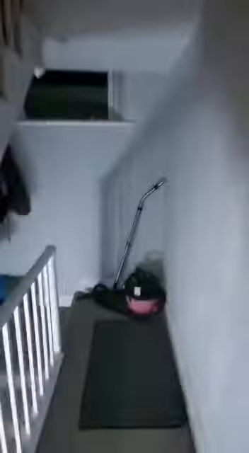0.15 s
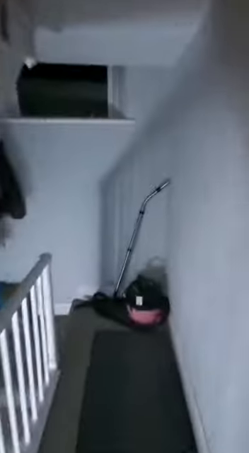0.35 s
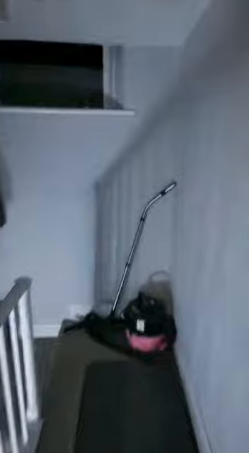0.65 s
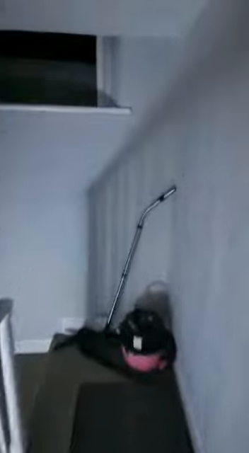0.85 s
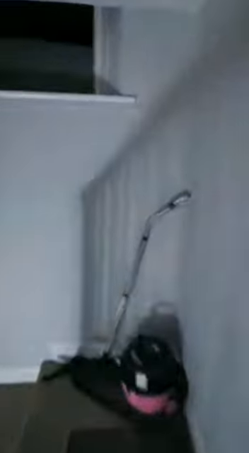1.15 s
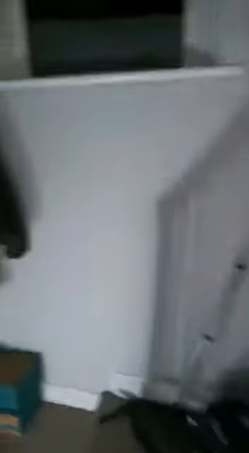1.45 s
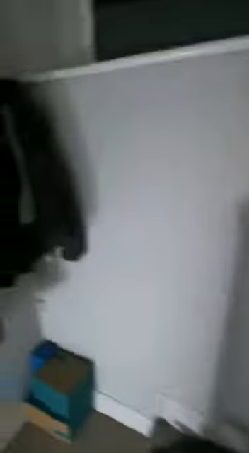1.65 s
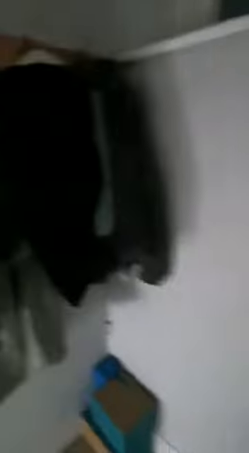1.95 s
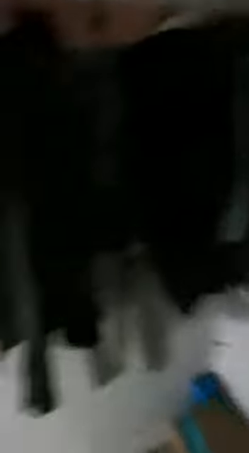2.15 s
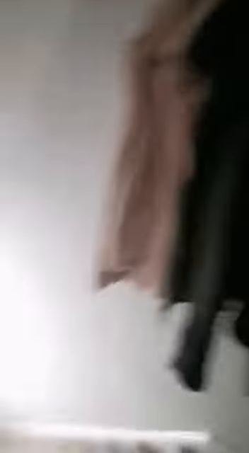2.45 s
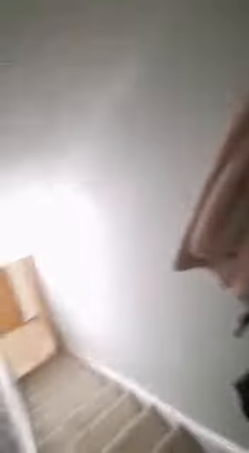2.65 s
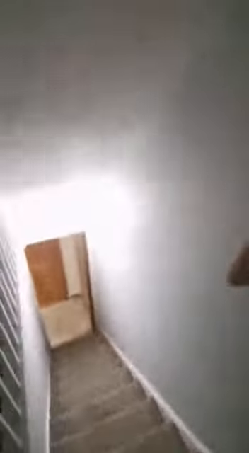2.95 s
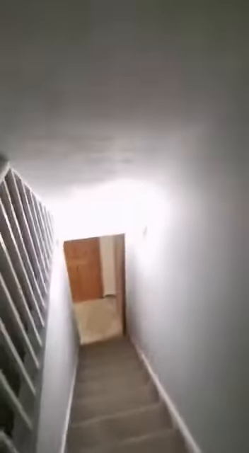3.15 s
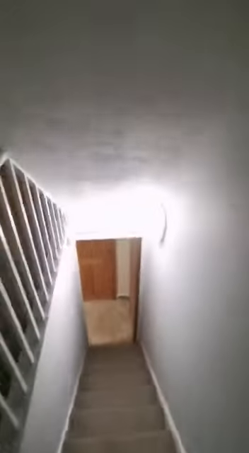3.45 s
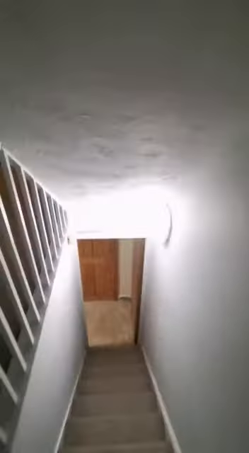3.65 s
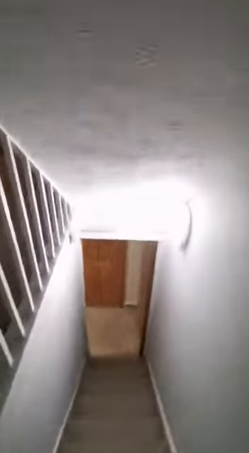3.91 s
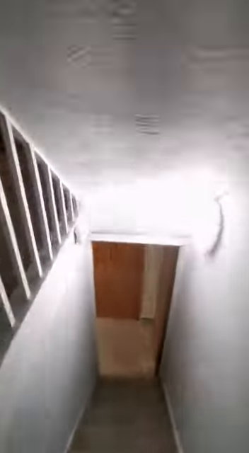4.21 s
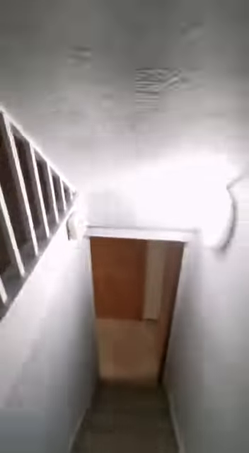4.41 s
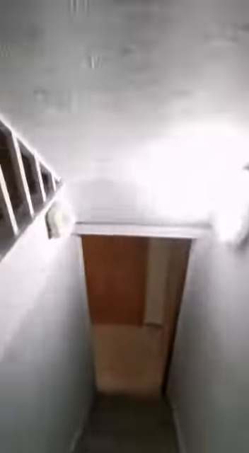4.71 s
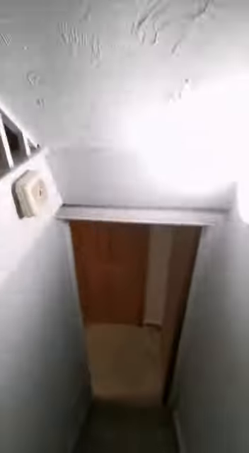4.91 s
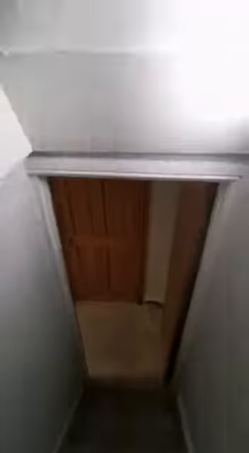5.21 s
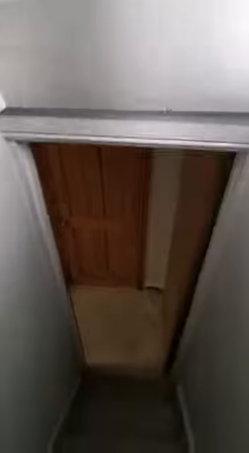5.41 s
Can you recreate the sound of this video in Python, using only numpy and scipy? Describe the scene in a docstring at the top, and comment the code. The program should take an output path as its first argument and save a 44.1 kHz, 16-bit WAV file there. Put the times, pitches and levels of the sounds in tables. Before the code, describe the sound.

Dull carpeted steps, roughly two per second, start quietly over a faint air hiss. One abrupt click sounds only on the left, then a sole drags in a turn. Going down hollow wooden stairs, boards knock and a hand slides dryly on painted plaster. The last steps come faster and much louder, booming, creaking and cracking in a small, slightly echoing stairwell.

```python
"""Soft footfalls cross a carpeted landing and go down a boxed-in wooden staircase: each load swings the floor
at a low mode and excites timber modes, joists and frame, more strongly on the treads.
Boards and hand knock (impulses and dying noise through resonances); joints squeak by stick and slip.
Cloth rustles and soles drag (enveloped noise), a palm slides along the wall (noise through a gliding resonance),
and filtered impulses tick at the left microphone port. Decaying noise echoes the knocks and squeaks; still air hisses."""
import sys
import numpy as np
from scipy import signal
from scipy.fft import rfft, irfft, next_fast_len
from scipy.io import wavfile

SR = 44100
rng = np.random.default_rng(int(sys.argv[2]) if len(sys.argv) > 2 else 0)


def store_wav(level_fs):
    """Save 16-bit WAV to argv[1]."""
    pcm = np.round(np.clip(np.atleast_2d(level_fs), -1, 1) * 32767)
    wavfile.write(sys.argv[1], SR, pcm.T.astype(np.int16))


N = 245637
T = np.arange(N) / SR

# All spectra are relative: columns f/Hz, level/dB. Source levels precede the gains of their layer.
# Still air of the house
AIR_SPECTRUM = [(20, 0.5), (43, 2.5), (154, -6), (222, -17.5), (319, -15.5), (660, -20), (2080, -30.5),
                (4420, -33.5), (7110, -29), (9200, -45.5), (15000, -45)]
AIR_DB = -63.5
# Diffuse field at the two ports: f/Hz, side over mid level/dB
SIDE_OVER_MID = [(60, -11.5), (250, -19.5), (500, -14.5), (1000, -11), (2000, -3), (5000, 0)]
# Spectral balance of the ports: f/Hz, left over right level/dB
LEFT_OVER_RIGHT = [(60, -2), (700, -2), (1800, 1), (3500, 0.5), (7000, -5), (14000, -2.5)]

# Steps: first touch t/s, boom level/dB, boom f/Hz, swell time t/s, timber level/dB;
# then full weight: delay t/s, boom level/dB, boom f/Hz, timber level/dB; then cloth swish level/dB
STEPS = [(0.12, -44, 62, 0.031, -66, 0.078, -57.5, 70.5, -50.5, -61),
         (.688, -40.5, 37.3, 0.028, -52.5, 0.036, -61, 49.7, -62, -65.5),
         (1.303, -25.5, 49.7, 0.029, -57.5, 0.045, -58, 50.6, -57, -64.5),
         (1.868, -36, 40.3, 0.026, -50, 0.029, -49, 52.7, -51.5, -63),
         (2.452, -36.5, 96.3, .022, -43, .09, -35.5, 51.9, -54.5, -61.5),
         (3.09, -52.5, 99, 0.035, -51, 0.042, -58, 70.5, -47, -65),
         (3.889, -44.5, 62, 0.037, -44, 0.066, -50, 70.4, -53, -55.5),
         (4.202, -31, 118, .021, -43.5, 0.07, -38, 61.5, -39.5, -59),
         (4.582, -31, 88.6, 0.031, -44.5, .1, -34, 75.7, -53, -65.5),
         (4.879, -12, 73.8, .02, -31.5, .08, -24.5, 70.8, -36.5, -52.5),
         (5.209, -23.5, 78, 0.019, -32, 0.039, -19, 69.7, -35.5, -54),
         (5.513, -21, 79.2, 0.015, -30.5, .019, -16, 77, -29, -52)]
# Modes of the treads: f/Hz, level/dB, t60 t/s
TREAD_MODES = [(133.4, 6, 0.39), (161.7, 4.5, 0.36), (186.2, 2.5, 0.32), (227.6, 4, 0.27),
               (301.2, -0.5, 0.45), (325, -1.5, 0.61), (348, -4.5, 0.46), (385, -11.5, 0.38),
               (477, -9, 0.53), (594, -11, 0.23), (700, -15.5, 0.2)]
# Neighbouring joists driven by the floor's swing: f/Hz, level/dB, t60 t/s
JOIST_MODES = [(67.6, -51, 0.68), (96, -50.5, .6), (129.2, -41, .5)]
# House frame rumbling on after a step
FRAME_SPECTRUM = [(10, -14), (24, 11), (45, 3), (75, 0), (135, -12), (200, -17), (400, -30.5),
                  (1200, -62.5)]
WEIGHT_SWELL_CYCLES = 2.23  # floor swings while the full weight builds up
WAVER_RAD, WAVER_PER_S = 0.5, 70  # phase spread and changes per s as the foot rolls

# Dull brushing of cloth, also the colour of soft thuds and the drumming wall
BRUSH_SPECTRUM = [(60, 2), (170, 0.5), (320, -2.5), (600, -16), (1000, -23.5), (3000, -47.5), (9000, -66)]
# Bright swish of cloth
SWISH_SPECTRUM = [(300, -0.5), (800, -2.5), (1400, 3), (2200, 1.5), (4500, -4.5), (7000, -2), (8500, -14),
                  (10500, -24), (15000, -25)]
# Swishes of trouser legs and sleeves: peak t/s, level/dB, half length t/s
SWISHES = [(0.285, -64, 0.019), (0.593, -67, 0.017), (0.666, -63, 0.017), (0.804, -62.5, 0.013),
           (0.872, -62.5, 0.033), (3.914, -50.5, 0.018), (4.643, -53.5, 0.044)]
# Cloth moves with each stride: loudest just after the weight arrives, never quite still
STRIDE_LAG_S, STRIDE_RISE_DB_PER_S, STRIDE_FALL_DB_PER_S = 0.018, 82, 46.5
BRUSH_OVER_TIMBER_DB, BRUSH_REST_DB, SWISH_REST_DB = -9, -67, -74

# Knocks of boards and hand: t/s, wood level/dB, crack level/dB, scuff level/dB, left over right level/dB,
# tone f/Hz, tone level/dB, contact t60 t/s (wood and scuff stretch it)
KNOCKS = [(0.2, -39, -58, -72, 3, 850, -50, .07), (0.211, -41.5, -62, -70, 2, 225, -43, .07),
          (0.392, -43, -57, -76, 1, 1000, -52, .08), (2.461, -51, -59, -78, -6, 230, -50, .1),
          (2.492, -46, -58, -70, -4, 470, -46, .14), (2.807, -53, -52, -52, -3, 1820, -50, 0.074),
          (2.872, -48, -50.5, -53.5, -3, 5200, -52.5, 0.087),
          (3.024, -45, -42, -34.5, -2.5, 3500, -45, 0.064), (3.111, -42, -50.5, -55.5, -3, 1150, -51, .11),
          (3.485, -39, -46, -58, -4, 950, -45, .14), (3.769, -37, -43, -65, 6, 734, -33, 0.019),
          (4.064, -27.5, -47, -73, 1, 382, -44, 0.056), (4.195, -40, -55, -57.5, 0, 720, -53, .06),
          (4.276, -41, -59, -60, -2, 736, -45, .06), (4.296, -35.5, -49, -48.5, -3, 309, -37.5, 0.065),
          (4.491, -41.5, -58.5, -57, -2.5, 330, -44.5, 0.15),
          (4.556, -41, -54.5, -54, -5.5, 2150, -55, .07), (4.622, -37.5, -56, -52, -5, 330, -39.5, .12),
          (4.786, -44.5, -73, -61.5, -7, 594, -56, 0.071), (4.968, -37, -49, -49, -6, 700, -37.5, 0.047),
          (4.994, -21, -35, -42, -4.5, 1010, -32, 0.054), (5.008, -26, -48, -62, 2, 334, -31.5, 0.067),
          (5.25, -32, -54, -62, -1, 476, -32.5, .09), (5.298, -27, -33.5, -52, -1, 1940, -33.5, 0.026),
          (5.302, -24.5, -28, -47, -1.5, 2530, -34.5, 0.038), (5.484, -23, -37.5, -48, -4, 900, -38, .04),
          (5.519, -26.5, -40.5, -43.5, -4, 322, -31.5, 0.064)]
# Wooden body of a contact
WOOD_SPECTRUM = [(100, -9.5), (230, 0), (340, 0.5), (520, -3.5), (800, -0.5), (1100, -6), (1800, -20),
                 (5000, -90)]
# Hard crack of a contact
CRACK_SPECTRUM = [(300, -37), (800, -12.5), (1150, 2), (1600, 4), (2200, 2), (3100, -4.5), (4500, -15),
                  (9000, -33.5), (15000, -50)]
# Scuffing of a contact
SCUFF_SPECTRUM = [(1200, -25.5), (2600, -6.5), (3500, 1), (4800, -5), (6000, -2), (7000, -1), (8300, -12.5),
                  (10500, -23.5), (15000, -23.5)]
# Board knocks under a step: levels over the full weight's timber level, and left over right
STEP_WOOD_DB, STEP_CRACK_DB, STEP_SCUFF_DB, STEP_PAN_DB = 4.5, -20, -17, -1
STEP_TONE_HZ, STEP_TONE_DB, STEP_CONTACT_S = 275, -7, 0.081
TONE_CYCLES = 26  # t60 of the struck spot, in cycles of its tone
EARLY_T60_S, STAIRWELL_T60_S = 0.29, 0.6

# Rubbing joints: part, t/s, length t/s, first slip f/Hz, last slip f/Hz, level/dB, roughness (0-1),
# left over right level/dB
SQUEAKS = [("riser", 0.208, 0.012, 3300, 2950, -44, 0.65, 9),
           ("riser", 4.918, 0.036, 760, 780, -38, 0.51, -4),
           ("nail", 4.92, 0.015, 2380, 2100, -38.5, 0.57, -8),
           ("nail", 4.929, 0.0206, 1680, 2250, -36.5, 0.55, -8),
           ("nail", 4.943, 0.028, 2290, 2200, -29, .14, -10),
           ("nail", 4.96, .018, 2150, 1780, -33, 0.6, -8),
           ("nail", 4.973, 0.016, 2300, 2100, -40.5, .65, -8),
           ("tread", 5.195, .021, 672, 716, -20.5, .16, -5),
           ("tread", 5.207, .044, 745, 798, -24.5, .31, -2)]
# Radiation of each squeaking part: for each part name, f/Hz, level/dB
PART_SPECTRA = {"tread": [(760, 0.5), (1400, -16), (2050, -5.5), (2300, -7.5), (2800, -4.5), (3100, -8.5),
                (3600, -20), (4100, -20), (4700, -38), (5500, -16), (6200, -22), (6850, -13), (7600, -32),
                (9000, -43), (15000, -58)], "riser": [(800, 1), (1600, -15), (2400, -9), (3200, -18),
                (6500, -40), (15000, -68)], "nail": [(2200, 0.5), (4450, -6), (6750, -10), (9000, -30),
                (15000, -48)]}
SQUEAK_ATTACK_S, SQUEAK_RELEASE_SHARE, SQUEAK_EDGE_ROUGH = 0.008, 0.57, 0.17

# Soles dragging as the walker turns: peak t/s, carpet pile level/dB, boards level/dB, half length t/s
DRAGS = [(0.25, -67, -57, 0.053), (0.42, -64, -58, .045), (1.816, -59, -56, 0.064),
         (2.559, -58, -55.5, 0.061)]
# Sole friction
SOLE_SPECTRUM = [(250, -7), (900, -0.5), (1500, -1), (2200, 0.5), (3500, -8), (7000, -15), (10000, -34)]

# Ticks at the left port: t/s, impulse level/dB
PORT_TICKS = [(1.4752, -19.5), (1.4875, 5.5), (2.9011, -22)]
# Colour of a tick
TICK_SPECTRUM = [(25, -27), (100, 1), (240, -1), (480, 1.5), (750, 1.5), (1360, -1), (1920, -7),
                 (2720, -11), (3840, -20), (5400, -29.5), (7700, -29), (11000, -48), (15000, -53)]

# Rasp of skin on paint
RASP_SPECTRUM = [(600, -19), (1100, -2), (1500, 0.5), (2000, 0.5), (2450, 0.5), (3200, -8), (5000, -22),
                 (10000, -55)]
# Resonance of the hollow palm, generally higher as the hand flattens: t/s, f/Hz
PALM_RESONANCE = [(3.4, 1440), (3.6, 1800), (3.74, 2020), (3.77, 2350), (3.83, 1950), (3.87, 2300),
                  (3.93, 2400)]
SLIDE_START_S, SLIDE_ATTACK_S, SLIDE_LIFT_S, SLIDE_RELEASE_S = 3.35, 0.054, 3.94, 0.045
RUB_DB, HISS_DB, RASP_DB, DRUM_DB = -55.5, -57.5, -61, -55.5
PRESS_S, PRESS_HALF_S, PRESS_DB = 3.765, 0.092, 12.5
PALM_WIDTH_HZ, PALM_RING_DB, PALM_PRESS_DB = 190, -61, 11
PALM_FLAT_S, PALM_FLATTEN_S = 3.67, 0.045
CATCHES_PER_S, CATCH_DB = 220, -60

CUTOFF_HZ = 15200


def from_db(db):
    """Logarithmic level: 20 dB is a tenfold amplitude."""
    return 10 ** (np.asarray(db) / 20)


def rms_one(x):
    """Power normalization: the rms becomes 1."""
    return x / np.sqrt(np.mean(x ** 2) + 1e-20)


def at_hz(points, hz):
    """Spectral interpolation along a logarithmic frequency axis."""
    f, value = np.transpose(points)
    return np.interp(np.log(np.maximum(hz, 1)), np.log(f), value)


def colour(x, points, keep_power=True):
    """Minimum-phase filtering: folding the cepstrum makes the response causal; white noise may keep its power."""
    size = next_fast_len(N + SR // 2) // 2 * 2
    gain = from_db(at_hz(points, np.arange(size // 2 + 1) * SR / size))
    if keep_power:
        gain = rms_one(gain)
    cepstrum = irfft(np.log(gain))
    cepstrum[1:size // 2] *= 2
    cepstrum[size // 2 + 1:] = 0
    response = np.exp(rfft(cepstrum))
    return irfft(rfft(x, size) * response)[..., :N]


def drift(rate):
    """Random modulation: interpolated chance values, rate per second, with a spread of 1."""
    knots = rng.standard_normal(N // 20)
    return rms_one(np.interp(T * rate, np.arange(len(knots)), knots))


def diffuse(grain_db):
    """Diffuse-field coherence: grainy noise is mostly shared in the bass and unrelated in the high treble."""
    mid, side = rng.standard_normal((2, N))
    side = colour(side, SIDE_OVER_MID, keep_power=False)
    grain = rms_one(from_db(grain_db * drift(700)))
    return np.array([mid + side, mid - side]) * grain


def sides(pan_db):
    """Level panning: the left-over-right difference is split between the ports."""
    return from_db([[pan_db / 2], [-pan_db / 2]])


def ring(force, hz, t60):
    """Modal resonance: a damped two-pole oscillator that keeps the power of white noise."""
    r, w = from_db(-60 / (t60 * SR)), 2 * np.pi * hz / SR
    b = np.sqrt((1 - r * r) / 2) * np.array([1, 0, -1])
    return signal.lfilter(b, [1, -2 * r * np.cos(w), r * r], force)


def air():
    """Background noise: a steady diffuse field with the spectrum of still air in the house."""
    return from_db(AIR_DB) * colour(diffuse(grain_db=2.0), AIR_SPECTRUM)


def clothes(brush_db=-1, swish_db=-2):
    """Sliding friction: cloth and soles brush with every stride and swish where they pass each other."""
    brush, swish = from_db(BRUSH_REST_DB), from_db(SWISH_REST_DB)
    for s, *_, delay_s, db, hz, timber_db, cloth_db in STEPS:
        age = T - s - delay_s - STRIDE_LAG_S
        stride = from_db(np.minimum(STRIDE_RISE_DB_PER_S * age, -STRIDE_FALL_DB_PER_S * age))
        brush = np.maximum(brush, from_db(timber_db + BRUSH_OVER_TIMBER_DB) * stride)
        swish = np.maximum(swish, from_db(cloth_db) * stride)
    for s, db, half_s in SWISHES:
        swish = swish + from_db(db) * np.exp(-((T - s) / half_s) ** 2)
    dull = colour(brush * diffuse(grain_db=-4), BRUSH_SPECTRUM)
    bright = colour(swish * diffuse(grain_db=1.0), SWISH_SPECTRUM)
    return from_db(brush_db) * dull + from_db(swish_db) * bright


def timber(force, damped_hz=1300, uneven_db=4.0):
    """Modal superposition: modes vary in drive as the feet move to new spots; carpet damps the treble."""
    strengths = from_db([db for hz, db, t60 in TREAD_MODES])
    modes = 0
    for strength, (hz, db, t60) in zip(strengths, TREAD_MODES):
        drive = force * rms_one(from_db(uneven_db * drift(10)))
        modes = modes + strength * ring(drive, hz, t60)
    damping = signal.butter(2, damped_hz, fs=SR, output="sos")
    return signal.sosfilt(damping, modes) / np.linalg.norm(strengths)


def swell(age):
    """Cushioned impulse: the push rises to 1 at age 1 and dies away."""
    return (age * np.exp(1 - np.minimum(age, 60))) ** 2


def loads():
    """Successive loading by first touch and full weight: t/s, boom level/dB, f/Hz, swell t/s, timber level/dB."""
    touches = [step[:5] for step in STEPS]
    weights = [(s + delay_s, db, hz, WEIGHT_SWELL_CYCLES / hz, timber_db)
               for s, *_, delay_s, db, hz, timber_db, cloth_db in STEPS]
    return touches + weights


def footfalls(shake_share=0.53, thud_db=-3, rumble_db=-19, rumble_lasts=1.83, frame_hz=60, stiffening=0.59):
    """Forced vibration: a cushioned load swings the floor at a low mode and shakes timber, joists and frame."""
    boom, load, frame = np.zeros((3, N))
    waver = WAVER_RAD * drift(WAVER_PER_S)
    for s, db, hz, swell_s, timber_db in loads():
        at = slice(int(s * SR), min(int((s + 1) * SR), N))
        age = T[:at.stop - at.start]
        swing = from_db(db) * swell(age / swell_s)
        phase = 2 * np.pi * hz * age + waver[at] * np.minimum(age / swell_s, 1)
        octave = stiffening * swing * np.sin(2 * phase)  # grows with wide swings
        boom[at] -= swing * (np.sin(phase) + octave)
        load[at] += from_db(timber_db) * swell(age / (shake_share * swell_s))
        reach = frame_hz / hz  # deep booms reach the frame best
        frame[at] += from_db(db) * reach * np.sqrt(swell(age / (rumble_lasts * swell_s)))
    thud = from_db(thud_db) * colour(load * diffuse(grain_db=-0.5), BRUSH_SPECTRUM)
    rumble = from_db(rumble_db) * colour(frame * rng.standard_normal(N), FRAME_SPECTRUM)
    # the tiny offset keeps the filters out of denormal numbers
    joists = sum(from_db(db) * ring(boom + 1e-18, hz, t60) for hz, db, t60 in JOIST_MODES)
    return boom + joists + timber(load * diffuse(grain_db=1)) + thud + rumble


def step_knocks():
    """Load transfer: the board under each foot knocks as it takes the full weight; rows as in KNOCKS."""
    return [(s + delay_s, timber_db + STEP_WOOD_DB, timber_db + STEP_CRACK_DB, timber_db + STEP_SCUFF_DB,
             STEP_PAN_DB, STEP_TONE_HZ, timber_db + STEP_TONE_DB, STEP_CONTACT_S)
            for s, *_, delay_s, db, hz, timber_db, cloth_db in STEPS]


def knocks(wood_db=-10, crack_db=-1, scuff_db=-2, tone_db=-1, ring_db=-13, strike_db=15,
           wood_lasts=1.33, scuff_lasts=1.23, rise_share=0.036):
    """Impact excitation: a strike and a dying flurry of slips ring the struck spot; long contacts start softly."""
    wood, crack, scuff, tones = np.zeros((4, 2, N))
    wood_slips, crack_slips, scuff_slips = [diffuse(grain_db=2.5) for _ in range(3)]
    for s, wood_level, crack_level, scuff_level, pan, hz, tone_level, t60_s in KNOCKS + step_knocks():
        at = slice(int(s * SR), min(int((s + 0.5) * SR), N))
        age = T[:at.stop - at.start]
        strike = from_db(strike_db) * (age == 0)
        onset = 1 - np.exp(-age / (rise_share * t60_s))
        fade_db = -60 * age / t60_s
        wood_flurry = onset * from_db(fade_db / wood_lasts) * wood_slips[:, at]
        scuff_flurry = onset * from_db(fade_db / scuff_lasts) * scuff_slips[:, at]
        force = sides(pan) * (strike + onset * from_db(fade_db) * crack_slips[:, at])
        wood[:, at] += from_db(wood_level) * (strike + wood_flurry)  # the wooden body is not panned
        crack[:, at] += from_db(crack_level) * force
        tones[:, at] += from_db(tone_level) * ring(force + 1e-18, hz, TONE_CYCLES / hz)
        scuff[:, at] += sides(pan) * from_db(scuff_level) * scuff_flurry
    body = from_db(wood_db) * colour(wood, WOOD_SPECTRUM)
    ringing = from_db(ring_db) * timber(wood) + from_db(tone_db) * tones
    cracks = from_db(crack_db) * colour(crack, CRACK_SPECTRUM)
    scuffs = from_db(scuff_db) * colour(scuff, SCUFF_SPECTRUM)
    return body + ringing + cracks + scuffs


def stairwell(x, first_echo_s=0.0013, late_db=-11):
    """Reverberation: close plaster walls return early echoes, and the tall shaft rings on faintly."""
    early = from_db(-60 * T / EARLY_T60_S)
    late = from_db(late_db) * from_db(-60 * T / STAIRWELL_T60_S)
    tail = diffuse(grain_db=-5.0) * (early + late) * (T > first_echo_s)
    tail = tail[:, :SR // 2]
    tail /= np.linalg.norm(tail, axis=1, keepdims=True)
    return signal.fftconvolve(x, tail, axes=1)[:, :N]


def squeak(row, friction, count=12):
    """Stick-slip oscillation: rough slipping blurs the pitch, and each overtone flutters on its own."""
    part, s, length_s, first_hz, last_hz, db, roughness, pan_db = row
    on = (T > s) & (T < s + length_s)
    age = T[on] - s
    catch = np.minimum(age / SQUEAK_ATTACK_S, 1)
    release = np.minimum((1 - age / length_s) / SQUEAK_RELEASE_SHARE, 1)
    grip = catch * release
    rough = np.clip(roughness + SQUEAK_EDGE_ROUGH * (1 - grip), 0, 1)  # rougher where the grip is weak
    hz = first_hz + (last_hz - first_hz) * age / length_s
    jitter = rough * (0.08 * drift(1500) + 0.015 * drift(250))[on]
    pitch = hz * (1 + jitter)
    phase = 2 * np.pi * np.cumsum(pitch) / SR
    k = np.arange(1, count + 1)[:, None]  # harmonic numbers
    knots = rng.standard_normal((count, 64))
    flutter_db = 2.5 * np.array([np.interp(age * 250, np.arange(len(knot)), knot) for knot in knots])
    strengths = from_db(at_hz(PART_SPECTRA[part], k * hz) + flutter_db) * (k * pitch < CUTOFF_HZ)
    overtones = np.sum(strengths * np.sin(k * phase), axis=0)
    tone = np.sqrt(2) * overtones / np.linalg.norm(strengths, axis=0)
    rasp = friction[on] * rms_one(1 + np.cos(phase))  # a puff of noise with every slip
    grit = 0.8 * rough
    stutter = from_db(6 * rough * drift(500)[on])
    out = np.zeros(N)
    out[on] = (np.sqrt(1 - grit ** 2) * tone + grit * rasp) * from_db(db) * grip * stutter
    return out * sides(pan_db)


def soles():
    """Friction-induced vibration: a sole scuffs over the carpet pile and the boards rumble under it."""
    pile, boards = np.zeros((2, N))
    for s, pile_db, boards_db, half_s in DRAGS:
        drag = np.exp(-((T - s) / half_s) ** 2)
        pile += from_db(pile_db) * drag
        boards += from_db(boards_db) * drag
    scuffs = colour(pile * diffuse(grain_db=2.0), SOLE_SPECTRUM)
    return scuffs + timber((boards + 1e-18) * diffuse(grain_db=2.5))


def port_ticks(rub_db=-42, rub_s=0.029, rub_grain_db=4):
    """Impulse response: each tick is a filtered pressure dip; a gritty rub leads into the loudest."""
    dips = -sum(from_db(db) * (np.arange(N) == int(s * SR)) for s, db in PORT_TICKS)
    loudest_s = max(PORT_TICKS, key=lambda tick: tick[1])[0]
    approach = np.exp(-np.abs(T - loudest_s) / rub_s) * (T < loudest_s)
    rub = from_db(rub_db) * approach * rms_one(diffuse(rub_grain_db)[0])
    left = colour(dips, TICK_SPECTRUM) + colour(rub, SWISH_SPECTRUM)
    return np.array([left, np.zeros(N)])


def moving_ring(force, hz, width_hz, size=128):
    """Time-varying resonance: the centre glides block by block, and white noise keeps its power."""
    out, state = np.zeros((2, N)), np.zeros((2, 2))
    r = np.exp(-np.pi * width_hz / SR)
    b = np.sqrt((1 - r * r) / 2) * np.array([1, 0, -1])
    for i in range(0, N, size):
        a = [1, -2 * r * np.cos(2 * np.pi * hz[i] / SR), r * r]
        out[:, i:i + size], state = signal.lfilter(b, a, force[:, i:i + size] + 1e-18, zi=state)
    return out


def palm_on_wall(catch_db=1.5, scratch_db=2.0):
    """Dry friction and cavity resonance: skin catches on painted grain, and the palm's hollow colours the rasp."""
    attack = np.clip((T - SLIDE_START_S) / SLIDE_ATTACK_S, 0, 1)
    lift = np.exp(-np.maximum(T - SLIDE_LIFT_S, 0) / SLIDE_RELEASE_S)
    stroke = attack * lift * from_db(catch_db * drift(50))
    press = np.exp(-((T - PRESS_S) / PRESS_HALF_S) ** 2)
    rasp = stroke * from_db(PRESS_DB * press + scratch_db * drift(350))  # fine ridges in the paint
    parts = [(stroke, RUB_DB, WOOD_SPECTRUM), (rasp, RASP_DB, RASP_SPECTRUM),
             (stroke, HISS_DB, SCUFF_SPECTRUM), (stroke, DRUM_DB, BRUSH_SPECTRUM)]  # the hollow wall drums
    rubbing = sum(from_db(db) * colour(gain * diffuse(grain_db=1.5), spectrum) for gain, db, spectrum in parts)
    catches = rms_one((rng.random(N) < CATCHES_PER_S / SR) * diffuse(grain_db=0.0))
    crackle = from_db(CATCH_DB) * colour(stroke * (1 + press) * catches, RASP_SPECTRUM)
    flat = np.clip((T - PALM_FLAT_S) / PALM_FLATTEN_S, 0, 1)
    friction = rms_one(catches + diffuse(grain_db=1.0))
    drive = stroke * from_db(PALM_RING_DB + PALM_PRESS_DB * flat) * friction
    palm_hz = np.interp(T, *np.transpose(PALM_RESONANCE))
    return rubbing + crackle + moving_ring(drive, palm_hz, PALM_WIDTH_HZ)


def scene(knock_room_db=-6, squeak_db=-3.5, squeak_room_db=-6):
    """Superposition: the sources add, knocks and squeaks reverberate, and each port has its own balance."""
    contacts = knocks()
    friction = colour(rng.standard_normal(N), SOLE_SPECTRUM)  # takes over when slipping turns rough
    squeaks = from_db(squeak_db) * sum(squeak(row, friction) for row in SQUEAKS)
    room = stairwell(from_db(knock_room_db) * contacts + from_db(squeak_room_db) * squeaks)
    sound = air() + clothes() + footfalls() + contacts + room + squeaks + soles() + palm_on_wall()
    ports = []
    for x, sign in zip(sound, (1, -1)):
        balance = [(hz, sign * db / 2) for hz, db in LEFT_OVER_RIGHT]
        ports.append(colour(x, balance, keep_power=False))
    return np.array(ports) + port_ticks()


def record(dry):
    """Band limitation: an elliptic low-pass cuts the top steeply; the last 3 ms fade out."""
    dry = dry * np.minimum((T[-1] - T) / 0.003, 1)
    low_pass = signal.ellip(10, 0.1, 80, CUTOFF_HZ, fs=SR, output="sos")
    return signal.sosfilt(low_pass, dry)


dry = scene()
out = record(dry)
store_wav(out)
```